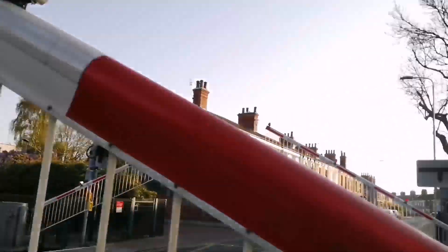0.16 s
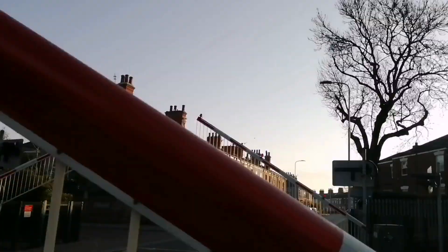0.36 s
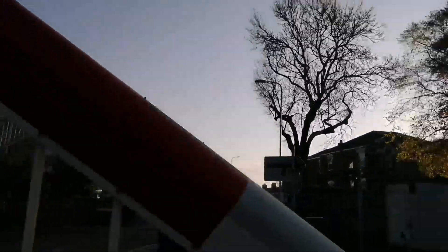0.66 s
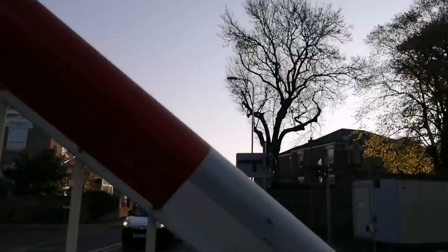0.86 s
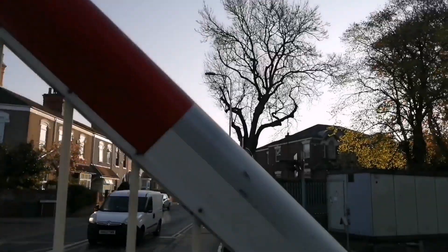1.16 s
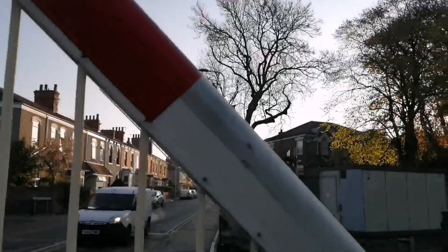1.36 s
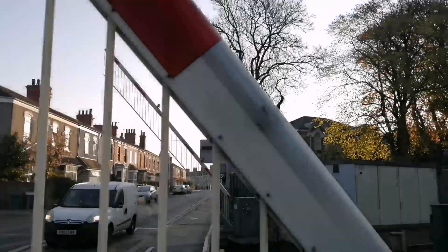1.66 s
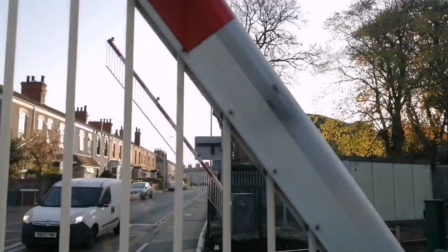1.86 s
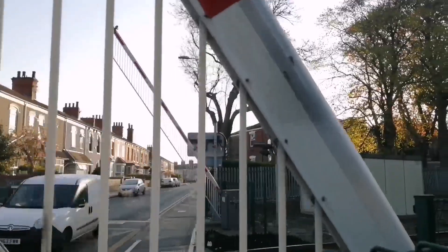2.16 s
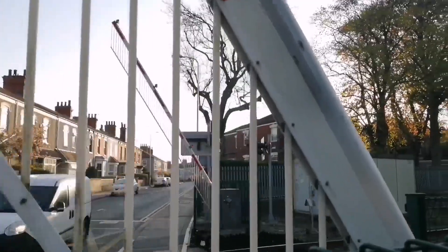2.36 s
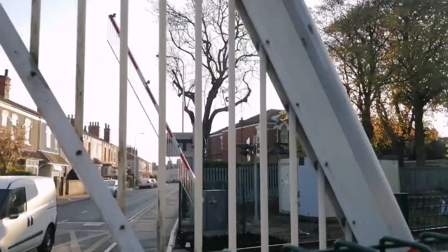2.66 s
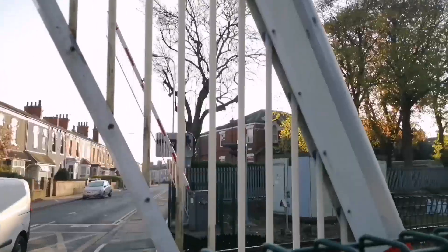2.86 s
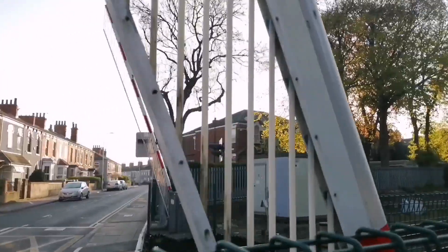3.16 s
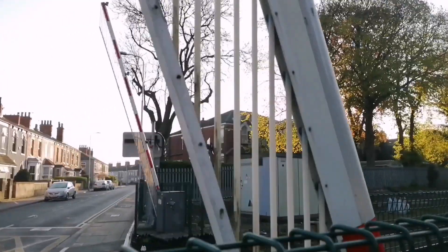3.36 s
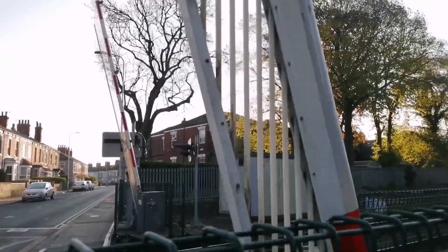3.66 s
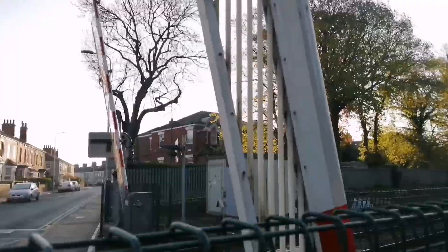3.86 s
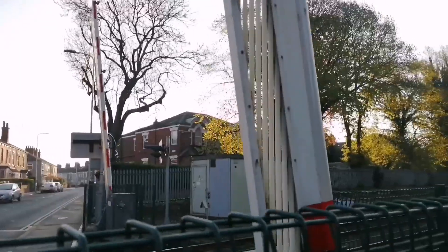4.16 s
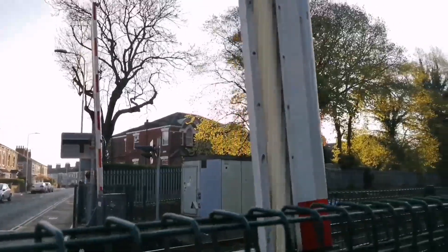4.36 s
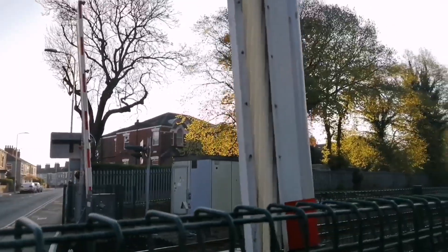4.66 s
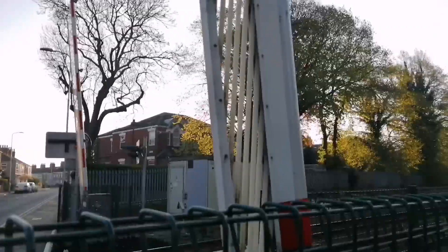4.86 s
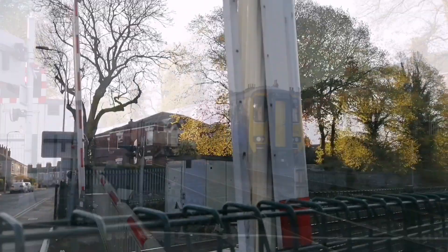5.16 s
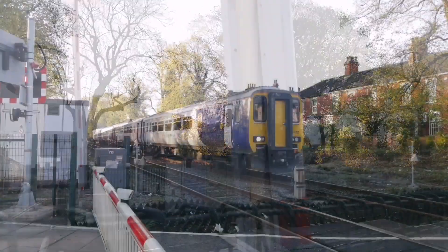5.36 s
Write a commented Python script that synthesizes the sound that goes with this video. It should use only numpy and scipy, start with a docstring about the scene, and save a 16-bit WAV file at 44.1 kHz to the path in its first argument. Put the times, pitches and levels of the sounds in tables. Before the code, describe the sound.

Close electric barrier drive hums beside a road with a passing van, folding metal rods rub and clatter, wind thumps, and the arm knocks to a stop.

```python
"""First heard is the hum of a level crossing barrier's drive, sinking in pitch, and a van beside it on the road.
The drive is a fluttering tone; the van is a low firing note, over a filtered-noise street.
A low-mid rush of grainy noise is tyre noise at first and later swells as the hanging skirt of metal rods folds.
The skirt rubs (grainy noise) and groans (rough gliding tones), then rattles and knocks home (struck resonances).
On a phone held close by, wind rumbles as uneven low noise, and a shifting grip scuffs and pops."""
import sys
import numpy as np
from scipy import signal
from scipy.fft import rfft, irfft, next_fast_len
from scipy.io import wavfile

SR = 44100
rng = np.random.default_rng(int(sys.argv[2]) if len(sys.argv) > 2 else 0)


def persist_wave(psi):
    """Save psi, clipped to +-1, as 16-bit WAV."""
    counts = np.round(np.clip(psi, -1, 1) * 32767).astype(np.int16)
    wavfile.write(sys.argv[1], SR, np.atleast_2d(counts).T)


N = 242594
TIME = np.arange(N) / SR  # s


def from_db(db):
    """Decibels to gain."""
    return 10 ** (np.asarray(db) / 20)


def rms_one(x):
    """Scale to an rms of 1."""
    return x / np.sqrt(np.mean(x ** 2) + 1e-20)


def in_time(rows):
    """Each column of a curve at every sample; the first column is time."""
    s, *columns = np.transpose(rows)
    return [np.interp(TIME, s, column) for column in columns]


def drift(rate):
    """Slow chance of spread 1 that changes about rate times a second."""
    step = 8  # samples between the computed points
    size = next_fast_len(N // step + 2)
    hz = np.arange(size // 2 + 1) * SR / step / size
    slow = irfft(rfft(rng.standard_normal(size)) / (1 + (hz / rate) ** 4), size)
    return np.interp(np.arange(N) / step, np.arange(size), rms_one(slow))


def coloured(x, spectrum):
    """Give x a spectrum that falls away beyond its ends; rms 1."""
    hz = np.maximum(np.arange(N // 2 + 1) * SR / N, 1)
    points, db = np.transpose(spectrum)
    skirts = np.minimum(hz / points[0], 1) ** 3 * np.minimum(points[-1] / hz, 1) ** 3
    shape = from_db(np.interp(np.log(hz), np.log(points), db))
    return rms_one(irfft(rfft(x) * skirts * shape, N))


def turning(hz):
    """Phase of a vibration whose pitch moves."""
    return 2 * np.pi * np.cumsum(hz) / SR


def rough_tone(phase, width_hz):
    """A tone that wanders in strength and phase; rms about 1."""
    return drift(width_hz / 2) * np.cos(phase) + drift(width_hz / 2) * np.sin(phase)


def body(x, modes):
    """Parallel resonances with alternating signs."""
    out = np.zeros(N)
    for k, (hz, width, db) in enumerate(modes):
        r = np.exp(-np.pi * width / SR)
        poles = [1, -2 * r * np.cos(2 * np.pi * hz / SR), r * r]
        ringing = signal.lfilter([1, 0, -1], poles, x + 1e-18)
        out += (-1) ** k * from_db(db) * (1 - r * r) / 2 * ringing
    return out


def friction(grain_db):
    """Countless tiny slips whose strength changes from moment to moment."""
    grain = drift(210) + 0.69 * drift(45)
    return rng.standard_normal(N) * from_db(grain_db * grain)


def swell(full_s, hold, rise, fall):
    """Gain that rises to 1, holds and falls; rise and fall are seconds per 10 dB."""
    early = np.maximum(full_s - TIME, 0)
    late = np.maximum(TIME - full_s - hold, 0)
    return from_db(-10 * np.minimum(early / rise + late / fall, 20))


def swells(rows, steady_db=-np.inf):
    """Gain of several swells over a steady level, added in power."""
    power = sum((from_db(db) * swell(*shape)) ** 2 for *shape, db in rows)
    return np.sqrt(from_db(steady_db) ** 2 + power)


# The far street's spectrum: (frequency [Hz], relative density [dB])
STREET_SPECTRUM = [(25, -0.5), (70, -1), (115, -7), (145, -7.5), (200, -3.5), (300, 0), (520, -5),
                   (900, -20), (2000, -20)]
STREET_DB = -55


def street():
    """The far street as a steady bed of low noise."""
    return from_db(STREET_DB) * coloured(rng.standard_normal(N), STREET_SPECTRUM)


# The van idles, revs up, changes gear and pulls again: (time [s], firing rate [Hz])
VAN_FIRING_RATE = [(0, 51.3), (.17, 46.4), (.45, 49.1), (.85, 44.64), (1.35, 65), (1.8, 75.7), (2.08, 78.3),
                   (2.65, 55.66), (3.1, 44.04), (3.9, 51.35), (5.5, 63.14)]
# The van's engine under load:
# (full at [s], hold [s], rise [s per 10 dB], fall [s per 10 dB], level [dB])
VAN_THROTTLE = [(.3, 0.57, 0.089, 0.25, -52), (1.3, 0.04, 0.11, 0.098, -46.5), (1.75, 0.65, .3, .15, -54.5),
                (2.87, 0.5, 0.11, 0.29, -45.5), (3.8, 0.4, 0.47, 0.5, -34.5),
                (4.8, 0.071, 0.12, 0.24, -46.5)]
ENGINE_DB = -58  # steady level under the load swells


def van_engine():
    """Low firing note, partly even and partly rough, with two rough overtones."""
    hz, = in_time(VAN_FIRING_RATE)
    phase = turning(hz)
    firing = 0.85 * np.sin(phase) + 0.74 * rough_tone(phase, 27)
    firing += 0.27 * rough_tone(2 * phase, 26)
    firing += 0.15 * rough_tone(3 * phase, 24)
    return swells(VAN_THROTTLE, ENGINE_DB) * firing


# Spectrum of the low-mid rush: (frequency [Hz], relative density [dB])
RUSH_SPECTRUM = [(200, -1), (400, -1), (520, 0), (640, 1.5), (850, -.5), (1100, -4), (1400, -8),
                 (2000, -30.5)]
# Low-mid rush, tyre noise at first, later swelling as the skirt folds:
# (full at [s], hold [s], rise [s per 10 dB], fall [s per 10 dB], level [dB])
RUSH_SWELLS = [(.5, 0.84, 1, 0.27, -56), (1.32, 0.05, 0.28, 0.87, -46), (3, 0.12, 0.39, .3, -56.5),
               (3.65, 0.37, 0.19, 0.78, -44.5), (4.3, 0.13, 0.39, 0.22, -37), (4.85, 0.38, .3, 0.33, -54.5)]
RUSH_DB = -62.5  # steady level under the swells


def low_mid_rush():
    """Grainy low-mid noise: tyre noise at first, later swelling as the skirt folds."""
    return swells(RUSH_SWELLS, RUSH_DB) * coloured(friction(grain_db=1.6), RUSH_SPECTRUM)


# Wind spectrum at the microphone: (frequency [Hz], relative density [dB])
WIND_SPECTRUM = [(22, -3.5), (35, 3), (55, -9.5), (80, -0.5), (110, -5.5), (145, -12.5), (175, -8.5),
                 (230, -11.5), (290, -10.5)]
# Gusts on the microphone:
# (full at [s], hold [s], rise [s per 10 dB], fall [s per 10 dB], level before lumps [dB])
WIND_GUSTS = [(3.2, 0.14, .38, 0.05, -42), (3.9, 0.18, 0.33, 0.24, -33), (4.35, .15, 0.12, 0.27, -34.5)]


def wind():
    """Gusts buffet the microphone port as a rumble of uneven strength."""
    lumps = from_db(3.66 * drift(14))
    return swells(WIND_GUSTS) * lumps * coloured(rng.standard_normal(N), WIND_SPECTRUM)


# Fingers rubbing on the phone: (frequency [Hz], relative density [dB])
SCUFF_SPECTRUM = [(90, 2), (250, -13.5), (700, -7), (1300, -18), (3200, -16.5), (4200, -30)]
# Fingers shifting on the phone:
# (full at [s], hold [s], rise [s per 10 dB], fall [s per 10 dB], level [dB])
GRIP_SCUFFS = [(3.2, 0.011, .012, .02, -44.5), (3.245, .028, .04, 0.015, -43.5),
               (3.326, 0.0073, 0.014, 0.006, -39)]


def grip():
    """Fingers slip on the phone's case in short dull scuffs."""
    return swells(GRIP_SCUFFS) * coloured(friction(grain_db=2.0), SCUFF_SPECTRUM)


# Resonance of the phone's case: (frequency [Hz], width [Hz], level [dB])
CASE_MODES = [(1050, 440, -8.5)]
# Pressure spikes at the microphone, before blunting:
# (time [s], peak level [dB], width [s], push +1 or pull -1)
MICROPHONE_POPS = [(3.199, -22, 0.00025, -1), (3.2059, -21.5, 0.0017, 1), (3.21, -17.5, .0002, -1),
                   (3.2109, -14.5, 0.0002, -1), (3.2572, -15, 0.000089, -1), (3.285, -16, 0.00029, 1),
                   (3.324, -20, 0.000089, -1), (3.3442, -11, 0.00066, 1), (3.3459, -21.5, 0.00062, -1),
                   (3.886, -21, .003, -1), (3.926, -18, 0.0025, -1), (3.935, -16, .0016, 1),
                   (3.972, -20, .004, 1), (3.984, -19, .003, -1), (4.016, -17, 0.00058, 1),
                   (4.06, -23, .0025, -1), (4.067, -12, 0.0017, 1), (4.102, -18, 0.00065, 1),
                   (4.4, -8.5, 0.0013, -1), (4.407, -13, 0.0022, 1)]


def pops(leak_hz, soft_hz):
    """Blunt pressure spikes ring the phone's case; the microphone leaks and swings back after each."""
    spikes = np.zeros(N)
    for s, db, width, way in MICROPHONE_POPS:
        distance = np.minimum(np.abs(TIME - s) / width, 20)
        spikes += np.sign(way) * from_db(db) * np.exp(-distance ** 0.89)
    soften = signal.butter(2, soft_hz, fs=SR, output="sos")
    leak = signal.butter(1, leak_hz, "high", fs=SR, output="sos")
    blunt = signal.sosfilt(soften, spikes + body(spikes, CASE_MODES))
    return signal.sosfilt(leak, blunt)


# The drive starts a little fast, slows steadily as the arm rises, and cuts out at the top
DRIVE_HZ, SAG_HZ_PER_S = 347.7, 3.25
OVERSHOOT_HZ, SETTLE_S = 2.49, 0.32
DRIVE_STOP_S, RUN_DOWN_S = 4.37, 0.093  # run-down in seconds per 10 dB
# Flutter as a share of the hum, less in mid travel where the arm runs smoothly
FLUTTER_SHARE, SMOOTH_SHARE = 0.38, 0.16
SMOOTH_FROM_S, SMOOTH_FOR_S = 1.8, 1.3
SMOOTH_IN_S, SMOOTH_OUT_S = 0.062, 0.16  # seconds per 10 dB
SMOOTH_QUIET_DB = 7  # the weak tones drop by this meanwhile
# Loudness of the hum: (time [s], level [dB])
DRIVE_LEVEL = [(0, -36.5), (.07, -33), (.45, -34), (.9, -36.5), (1.25, -40.5), (1.65, -38), (1.85, -40),
               (2.15, -36.5), (3.2, -37), (3.4, -41), (3.68, -32), (4.03, -31.5), (4.35, -33)]
# Weak tones of the drive: (multiple of its pitch, level against the hum [dB])
DRIVE_WEAK_TONES = [(.8, -19), (0.926, -18.5), (2, -27)]


def drive():
    """A nearly pure hum that flutters as the load shakes, with weak tones around it."""
    level_db, = in_time(DRIVE_LEVEL)
    smooth = swell(SMOOTH_FROM_S, SMOOTH_FOR_S, SMOOTH_IN_S, SMOOTH_OUT_S)
    depth = FLUTTER_SHARE + (SMOOTH_SHARE - FLUTTER_SHARE) * smooth
    overshoot = OVERSHOOT_HZ * np.exp(-TIME / SETTLE_S)
    phase = turning(DRIVE_HZ - SAG_HZ_PER_S * TIME + overshoot)
    shake = turning(19 + 6 * drift(4.8))
    # a second tone lower by the shake rate beats with the hum
    hum = np.sqrt(2) * (np.sin(phase) + 0.52 * depth * np.sin(phase - shake))
    hum += 0.43 * depth * rough_tone(phase, 26)
    for multiple, tone_db in DRIVE_WEAK_TONES:
        hum += from_db(tone_db - SMOOTH_QUIET_DB * smooth) * rough_tone(multiple * phase, 29)
    running = swell(0, DRIVE_STOP_S, 1, RUN_DOWN_S)
    return from_db(level_db) * hum * running


# Groans and squeaks of the skirt's pivots, and late weak rough tones near 580 and 1070 Hz:
# (time of the middle [s], length [s], pitch [Hz], glide [Hz per s], roughness width [Hz],
# level [dB], clean share [0-1])
ROUGH_TONES = [(0.067, 0.29, 2080, 8, 72, -64.5, 0.4), (0.758, 0.33, 781, -10, 29.9, -58.5, 1),
               (0.856, .05, 4520, -2500, 101, -66, .6), (1.385, .5, 682, 0, 45, -45.5, .62),
               (1.42, 0.62, 635.5, -0.5, 101, -49.5, 0.32), (1.37, 0.23, 856, 0, 50.6, -51.5, 0.3),
               (1.92, 0.42, 882, -12, 44.5, -50.5, 0.6), (1.318, 0.46, 1755, 40, 75, -54.5, .45),
               (1.778, 0.39, 1717, 0, 98.6, -58, 0.2), (1.36, 0.21, 3420, -150, 109, -64, 0.1),
               (1.76, 0.3, 2340, -650, 45, -57, 0.5), (1.82, 0.26, 2800, -1, 60, -60, 0.6),
               (1.949, .35, 6930, 151.5, 111, -59.5, .4), (2.12, 0.1, 2050, -300, 50, -56, 0.8),
               (2.35, 0.26, 1766, -550, 127, -61.5, 0.26), (2.6, .62, 3073, -11, 25, -66, 0.8),
               (4.923, 0.6, 578, -0.5, 110, -55, .3), (5.12, 0.42, 1064, -150, 70, -57.5, 0.33),
               (5.42, 0.31, 580, 32, 25, -56, 0.67)]


def groans():
    """Pivots catch, sing roughly on one resonance and let go; weak rough tones follow late on."""
    out = np.zeros(N)
    for s, length, hz, glide, width, db, clean in ROUGH_TONES:
        singing = np.exp(-np.abs((TIME - s) / length * 1.76) ** 8)
        phase = turning(hz + glide * (TIME - s) + 0.12 * width * drift(19.87))
        tone = clean * np.sqrt(2) * np.sin(phase) + (1 - clean) * rough_tone(phase, width)
        out += from_db(db) * singing * rms_one(tone)
    return out


def hollow(x, echo):
    """Sound bounces inside the hollow arm, which combs it into many fine peaks; rms 1."""
    out = x.copy()
    lags = (rng.uniform(0.001, 0.012, size=8) * SR).astype(int)
    for lag in lags:
        out[lag:] += echo * rng.choice([-1, 1]) * x[:-lag]
    return rms_one(out)


# Rods singing as they slide:
# (lowest pitch [Hz], highest pitch [Hz], number of voices, gain under the scrape swells [dB])
SINGING_RODS = [(1850, 3550, 14, -6.5), (5140, 6800, 10, -13)]
VOICE_WIDTH_HZ, VOICE_WANDER_HZ, VOICE_PATCHY_DB = 49, 110, 4


def rod_voices():
    """Sliding rods sing patchily, each on a narrow resonance that wanders as the contact moves."""
    out = np.zeros(N)
    for low_hz, high_hz, count, db in SINGING_RODS:
        voices = np.zeros(N)
        for hz in np.geomspace(low_hz, high_hz, int(round(count))):
            patches = from_db(VOICE_PATCHY_DB * drift(8))
            phase = turning(hz + VOICE_WANDER_HZ * drift(3))
            voices += patches * rough_tone(phase, VOICE_WIDTH_HZ)
        out += from_db(db) * rms_one(voices)
    return out


CLATTER_PER_S, CLATTER_DB = 170, -9  # mean rate of touches; level against the hiss
# Resonances of the rods, also struck in rattle(): (frequency [Hz], width [Hz], level [dB])
ROD_MODES = [(2244, 160, -2.5), (3220, 360, -7.5), (5100, 390, -6), (6640, 537, -3), (7160, 180, 0.5)]


def clatter(spread_db):
    """Many small chance touches between the folding rods ring them; rms 1."""
    strengths = from_db(spread_db * np.minimum(rng.exponential(1, N), 3))
    touches = strengths * rng.choice([-1, 1], N) * (rng.random(N) < CLATTER_PER_S / SR)
    return rms_one(body(touches, ROD_MODES))


# Scrape of the sliding metal: (frequency [Hz], relative density [dB])
SCRAPE_SPECTRUM = [(900, -16), (1100, -10.5), (1250, -8), (1450, -7), (1570, -6), (1720, 0), (2150, 0),
                   (2370, -4.5), (2560, -1), (3200, -2.5), (3550, -6), (4000, -10), (4800, -15),
                   (6000, -33.5)]
# Bright hiss above the scrape: (frequency [Hz], relative density [dB])
HISS_SPECTRUM = [(3600, -28), (4200, -9.5), (4700, -3), (5250, 2), (6100, 0), (6600, -1), (7050, 3),
                 (7400, -7.5), (7800, -36.5)]
SCRAPE_DB, HISS_DB = -66.5, -66  # steady swell levels under the strokes
# Strokes of the skirt sliding on its pivots: (full at [s], hold [s],
# rise [s per 10 dB], fall [s per 10 dB], scrape swell level [dB], hiss swell level [dB])
SKIRT_RUBS = [(0, 0.96, .3, 0.3, -61, -73), (1.345, 0.05, 0.32, 0.31, -49.5, -60),
              (1.468, 0.16, 0.11, 0.84, -46.5, -57), (1.927, 0.13, 0.34, 0.4, -55, -53),
              (3.006, 0.16, 0.29, 0.19, -53, -52.5), (3.598, 0.68, 0.13, 0.37, -39.5, -50.5),
              (3.892, 0.22, 0.3, 0.26, -43, -43), (4.446, 0.014, 0.082, 0.038, -39.5, -40.5),
              (4.755, 0.12, 0.38, 0.3, -51, -52), (5.171, 0.024, 0.033, 0.099, -47, -45)]


def skirt():
    """Sliding metal: a grainy scrape with singing rods, and a bright hiss with clattering rods."""
    scraping = swells([(*shape, db) for *shape, db, _ in SKIRT_RUBS], SCRAPE_DB)
    hissing = swells([(*shape, db) for *shape, _, db in SKIRT_RUBS], HISS_DB)
    scrape = from_db(-1.3) * hollow(coloured(friction(grain_db=1.76), SCRAPE_SPECTRUM), echo=0.095)
    hiss = hollow(coloured(friction(grain_db=1.63), HISS_SPECTRUM), echo=0.12)
    touches = from_db(CLATTER_DB) * clatter(spread_db=1.5)
    return scraping * (scrape + rod_voices()) + hissing * (hiss + touches)


def strikes(events, modes, snap, rise, linger, gain_db):
    """Contacts snap, chatter unevenly and ring the struck part; low modes build and die more slowly."""
    chatter = rng.standard_normal(N) * from_db(1.9 * drift(700))
    octaves = np.log2([hz for hz, _, _ in modes])
    octaves = octaves - octaves.mean()
    age = TIME[:SR // 2]
    out = np.zeros(N)
    for k, (mode, octave) in enumerate(zip(modes, octaves)):
        snaps = np.zeros(N)
        force = np.zeros(N + SR)  # room for contacts near the end
        clock = age * 2 ** (linger * octave)  # runs slower for low modes
        for s, db, t60, tilt_db in events:
            start = int(s * SR)
            strength = from_db(db + tilt_db * octave)
            snaps[start] += snap * strength
            envelope = from_db(-60 * clock / t60) * (1 - np.exp(-clock / rise))
            force[start:start + len(age)] += strength * envelope
        out += (-1) ** k * body(snaps + force[:N] * chatter, [mode])
    return from_db(gain_db) * out / np.std(body(chatter, modes))


# Rods clicking against each other: (time [s], relative strength [dB],
# nominal 60 dB decay of the contact [s], brightness [dB per octave])
ROD_CLICKS = [(1.466, -36, .05, -4), (1.528, -36, .04, -3.5), (1.576, -32, .025, -3.5),
              (3.576, -32, .03, -3), (4.059, -21, 0.036, -4), (4.349, -21.5, 0.069, 3),
              (4.491, -21, 0.036, -9), (4.504, -18, .025, 0.5), (4.6443, -28, 0.069, -3),
              (4.6766, -20.5, 0.051, -1.5), (4.7374, -24, 0.017, 0), (4.7458, -19, 0.034, 4),
              (4.7495, -22, 0.036, -1), (4.78, -32, .03, 6), (4.8198, -22.5, 0.017, 3),
              (4.8814, -23.5, 0.024, 2.5), (4.8982, -19.5, 0.051, 2), (4.9268, -21.5, .04, -2),
              (4.9402, -17, 0.022, -4), (4.9504, -20.5, 0.039, 0), (4.9624, -24, 0.031, 2),
              (4.98, -31, .04, -1), (4.989, -32, .035, 2), (5.4784, -36.5, 0.027, 4)]


def rattle():
    """Rods click against each other, each contact ringing the rods' resonances."""
    return strikes(ROD_CLICKS, ROD_MODES, snap=6.2, rise=0.00026, linger=0.077, gain_db=-12.0)


# Resonances of the arm: (frequency [Hz], width [Hz], level [dB])
ARM_MODES = [(180, 58, 5), (540, 35, 4), (678, 47, 3.5), (1010, 350, -4), (1780, 190, 1), (2110, 220, 2),
             (2800, 320, -3), (3420, 290, -1.5), (5170, 700, -7.5), (6550, 600, -6.5)]
# The arm knocking home: (time [s], relative strength [dB],
# nominal 60 dB decay of the contact [s], brightness [dB per octave])
ARM_KNOCKS = [(4.5145, -24, .12, 0), (4.521, -21, .11, -1.2), (4.535, -30, .13, -0.5),
              (5.2372, -28.5, .13, 0)]


def knocks():
    """The arm hits its stop with a softer onset and rings lower than the rods."""
    return strikes(ARM_KNOCKS, ARM_MODES, snap=4.5, rise=0.0022, linger=0.24, gain_db=-3.5)


SHUDDER_HZ = 75
# The arm shuddering after its stop:
# (full at [s], hold [s], rise [s per 10 dB], fall [s per 10 dB], level [dB])
ARM_SHUDDER = (4.6, .02, .025, .075, -33.5)


def shudder(width_hz):
    """The arm shakes with a low, slightly wandering note just after it knocks home."""
    *shape, db = ARM_SHUDDER
    phase = turning(SHUDDER_HZ + width_hz * drift(20))
    return from_db(db) * swell(*shape) * np.sqrt(2) * np.sin(phase)


def scene():
    """Road, rush, wind, handling and barrier at one microphone."""
    background = street() + van_engine() + low_mid_rush() + wind()
    handling = grip() + pops(leak_hz=45, soft_hz=4200)
    barrier = drive() + groans() + skirt() + rattle() + knocks() + shudder(width_hz=6)
    return (background + handling + barrier)[None, :]


CUTOFF_HZ = 7750


def record(dry):
    """Steep low-pass: next to nothing is heard above about 7.8 kHz."""
    steep = signal.ellip(12, 0.2, 70, CUTOFF_HZ, fs=SR, output="sos")
    return signal.sosfilt(steep, dry)


dry = scene()
out = record(dry)
persist_wave(out)
```